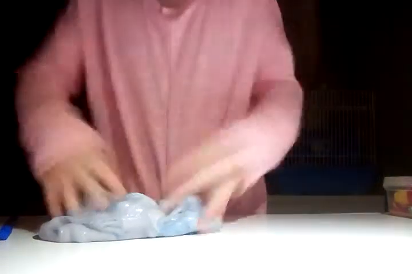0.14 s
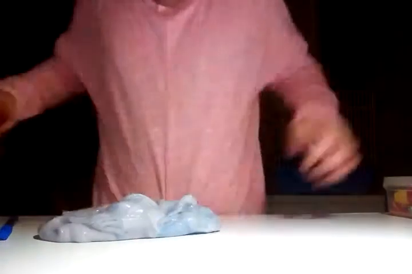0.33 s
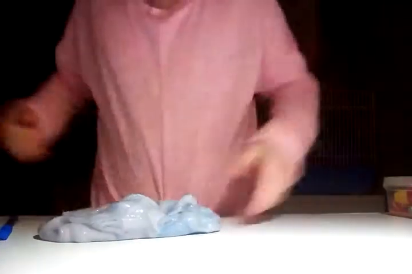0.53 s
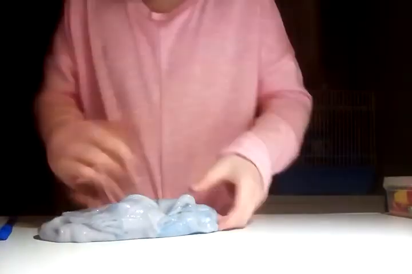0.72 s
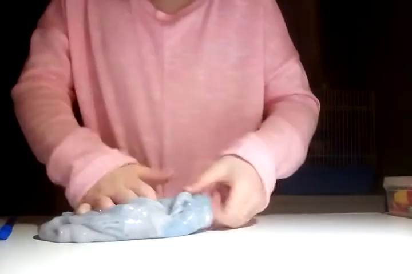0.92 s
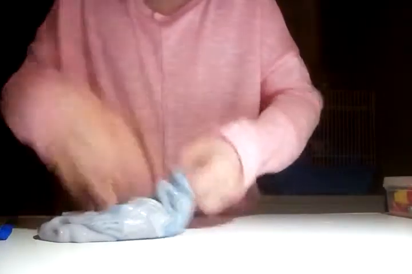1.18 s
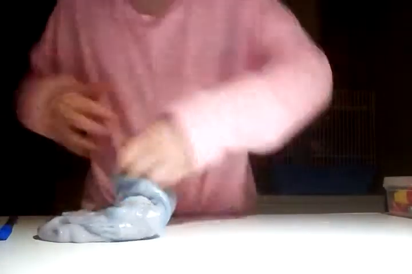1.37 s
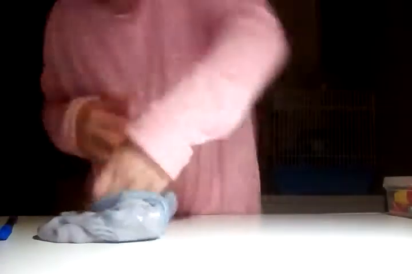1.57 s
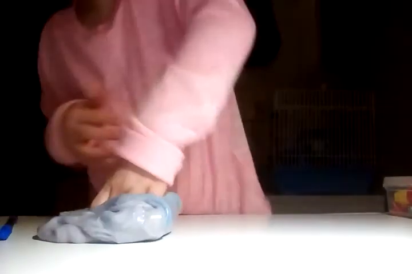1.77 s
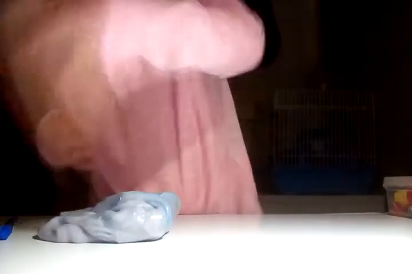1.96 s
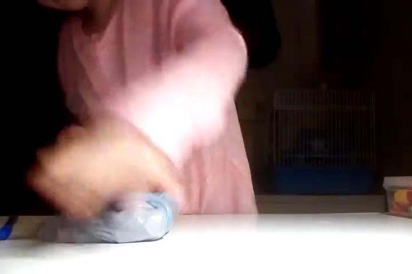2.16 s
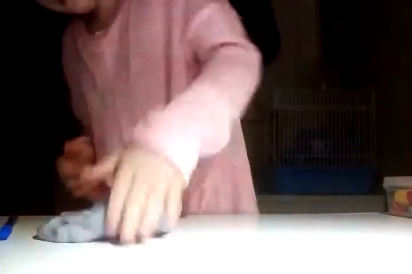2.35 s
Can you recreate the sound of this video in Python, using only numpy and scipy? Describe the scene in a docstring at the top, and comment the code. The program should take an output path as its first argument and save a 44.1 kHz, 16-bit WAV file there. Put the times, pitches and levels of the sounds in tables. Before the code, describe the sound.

Slime is squished by hand on a table, starting with the loudest wet squelch and a cluster of pops at about 0.2 seconds. Faint sticky crackles and small pops follow, with a dull palm thump near 0.9 and another squelch at 1.2. Light ticks come around 1.6 to 1.8, then a thumping, popping press at 2.0 and a softer one near 2.4, over a faint low room hum.

```python
"""Squeezing slime on a table

Hands slap, fold and squeeze a lump of slime in a small room. Trapped air pockets pop,
each squeeze drives out a spray of tiny bubbles, and the palm thumps the tabletop.
In between, the slime crackles faintly as it sticks to the fingers, and thin threads of it snap."""
import sys
import numpy as np
from scipy import signal
from scipy.fft import rfft, irfft, next_fast_len
from scipy.io import wavfile
from scipy.ndimage import map_coordinates

SR = 44100
rng = np.random.default_rng(int(sys.argv[2]) if len(sys.argv) > 2 else 0)


def pcm_store(signal):
    """Save signal as 16-bit PCM."""
    levels = np.round(np.clip(np.atleast_2d(signal), -1, 1) * 32767)
    wavfile.write(sys.argv[1], SR, levels.astype(np.int16).T)


N = 110250  # 2.5 seconds


def amp(db):
    """Turn decibels into a number to multiply by."""
    return 10 ** (np.asarray(db) / 20)


def unit(x):
    """Scale a sound to an average (rms) strength of 1."""
    return x / np.sqrt(np.mean(x ** 2) + 1e-20)


def along(points, hz):
    """Read between (frequency, value) points, with octaves evenly spaced."""
    f, values = np.transpose(points)
    return np.interp(np.log(hz + 1), np.log(f + 1), values)


def colour(x, tone):
    """Make some frequencies louder and others softer, following a tone table."""
    size = 2 * next_fast_len(len(x))
    gain = amp(along(tone, np.fft.rfftfreq(size, 1 / SR)))
    cepstrum = irfft(np.log(gain), size)
    # fold it so that the filter rings only after a sound, never before
    cepstrum[1:size // 2] *= 2
    cepstrum[size // 2 + 1:] = 0
    return irfft(rfft(x, size) * np.exp(rfft(cepstrum)), size)[:len(x)]


def add(track, start, sound):
    """Mix a sound in at a start time in seconds."""
    i = max(0, round(start * SR))
    part = sound[:max(0, N - i)]
    track[i:i + len(part)] += part


def dying(t, fade):
    """Die away by 60 dB every `fade` seconds."""
    return np.exp(-np.log(1000) * t / fade)


def crackle(per_s, scatter_db):
    """Clicks at random times and of random size."""
    happens = rng.random(N) < per_s / SR
    size = amp(scatter_db * rng.standard_normal(N))
    return happens * size * rng.choice([-1, 1], N)


def noise(samples, tone):
    """Steady noise with the given tone."""
    return unit(colour(rng.standard_normal(samples), tone))


# Tone of the room's background: f/Hz, level/dB
RUMBLE_TONE = [(25, 0), (60, -7), (100, 5), (150, -4.5), (250, -17), (600, -20.5), (1100, -27),
               (2000, -31.5), (6500, -30), (14000, -27.5)]

def rumble():
    """The room hums with a quiet, low noise throughout."""
    return amp(-52.5) * noise(N, RUMBLE_TONE)


# How the faint crackle and the soft rubbing rise and fall: t/s, level/dB
CLING_LEVELS = [(0.0, -53.5), (0.16, -66), (0.21, -57), (0.45, -73), (0.7, -68), (0.99, -65), (1.15, -58),
                (1.25, -50.5), (1.42, -62), (1.58, -71), (1.84, -59.5), (2.02, -67), (2.13, -71),
                (2.39, -77.5), (2.47, -64)]
RUB_LEVELS = [(0.0, -42.5), (0.18, -51.5), (0.25, -47), (0.36, -68), (0.41, -79), (0.67, -67), (1.13, -50),
              (1.23, -62), (1.37, -50.5), (1.43, -70), (1.66, -74), (1.79, -44.5), (1.84, -52), (1.9, -46),
              (2.08, -64), (2.31, -60.5), (2.4, -73), (2.47, -59)]
# Tone of wet clicks (also used for the spray) and of rubbing: f/Hz, level/dB
WET_TONE = [(300, -11), (1200, -2), (2100, -1.5), (3000, 5.5), (3700, -3.5), (4400, 4.5), (5400, -0.5),
            (6500, 0.5), (8000, -9), (13000, -9.5)]
RUB_TONE = [(100, -18.5), (250, -6), (350, -4.5), (600, 0.5), (800, 0), (1100, -5.5), (1500, -9.5),
            (3000, -23.5), (8000, -47.5)]

def sticky_fingers():
    """Slime clings to moving fingers: a fine crackle over soft rubbing."""
    t = np.arange(N) / SR
    ticks = unit(colour(crackle(per_s=2200, scatter_db=6), WET_TONE))
    rub = unit(colour(crackle(per_s=2200, scatter_db=6), RUB_TONE))
    ticks_db = np.interp(t, *np.transpose(CLING_LEVELS)) - 1
    rub_db = np.interp(t, *np.transpose(RUB_LEVELS)) - 2
    return amp(ticks_db) * ticks + amp(rub_db) * rub


# Air pockets that burst: t/s, ring level/dB, f/Hz, fade/s, snap level/dB
AIR_POCKETS = [(0.178, -34.5, 1050, 0.035, -70.5), (0.1999, -9.5, 1026, 0.011, -16.5),
               (0.2046, -1.5, 436, 0.02, -32.5), (.2135, -3, 680, .025, -24.5),
               (0.2214, -5, 505, 0.05, -46), (0.2464, 0.5, 924, 0.018, -8.5),
               (.3545, -17, 972, 0.0076, -30.5), (.363, -31, 514, 0.042, -66.5),
               (0.6496, -28, 1088, 0.012, -62), (0.6523, -34, 1984, 0.0062, -45),
               (0.806, -32.5, 979, .016, -43), (0.811, -32, 450, 0.0083, -62),
               (0.904, -37, 1074, 0.028, -44.5), (0.978, -40, 1470, 0.032, -66.5),
               (1.0022, -23, 2940, 0.0058, -29), (1.003, -31.5, 1120, 0.03, -48),
               (1.005, -21.5, 2720, 0.0079, -49), (1.062, -35, 1100, 0.0043, -32),
               (1.0987, -32.5, 2580, 0.026, -34), (1.1173, -33.5, 454, 0.038, -64),
               (1.191, -25.5, 1050, .035, -47), (1.2185, -19, 508, 0.014, -32.5),
               (1.2251, -14.5, 458, 0.01, -49), (1.235, -23.5, 1000, .02, -46),
               (1.608, -37, 1137, 0.028, -28.5), (1.62, -39, 1016, .012, -29),
               (1.626, -33.5, 420, 0.06, -47), (1.656, -25, 1105, 0.0065, -41),
               (1.671, -30, 420, 0.02, -59), (1.7282, -29.5, 930, 0.015, -63), (1.732, -26, 508, .028, -68),
               (1.7846, -42, 1206, 0.028, -33), (1.787, -53.5, 2500, 0.025, -33.5),
               (1.908, -36, 571, 0.045, -35), (1.953, -25.5, 1085, .018, -53),
               (1.967, -20.5, 1073, .012, -24.5), (1.977, -17.5, 503, .025, -32),
               (1.987, -21.5, 1004, .025, -55), (1.999, -17, 484, 0.076, -45),
               (2.009, -18, 348.5, .04, -52), (2.354, -36, 1063, 0.06, -49),
               (2.362, -39.5, 1624, 0.026, -52), (2.437, -34, 504, 0.054, -37),
               (2.481, -34.5, 1097, 0.047, -32), (2.496, -30.5, 4020, 0.045, -40)]
# Tone of a pocket's snapping skin: f/Hz, level/dB
SNAP_TONE = [(200, -17), (900, 9), (1600, 10.5), (2200, -5), (3000, 1.5), (3700, -16.5), (4400, 4),
             (5400, -9.5), (6500, 0.5), (12000, -31)]

def pops():
    """A pocket's skin snaps and its air rings briefly, shaky and sagging in pitch."""
    attack_s, sag_s, shakes_per_cycle = 0.0006, 0.0036, 2.466
    out, t = np.zeros(N), np.arange(SR // 10) / SR
    for start, db, hz, fade, snap_db in AIR_POCKETS:
        # the soft wall shakes the pitch, which starts high and sags as the pocket opens
        shake = map_coordinates(rng.standard_normal(len(t)), [t * hz * shakes_per_cycle])
        pitch = hz * (1 + 0.08 * np.exp(-t / sag_s) + 0.19 * shake)
        phase = 2 * np.pi * np.cumsum(pitch) / SR
        shape = (1 - np.exp(-t / attack_s)) * dying(t, fade)
        ring = np.sin(phase) * shape / shape.max()
        snap = noise(len(t), SNAP_TONE) * dying(t, fade=0.017)
        add(out, start, amp(db) * ring + amp(snap_db) * snap)
    return out


def bubbles(sizes=24, per_s=1500, middle_hz=680, ring_cycles=7):
    """A dense froth of tiny bubbles; smaller ones ring higher and die sooner."""
    froth, t = np.zeros(N), np.arange(SR // 20) / SR
    for step in np.linspace(-2, 2, sizes):
        hz = middle_hz * np.exp(0.62 * step)
        ring = np.sin(2 * np.pi * hz * t) * dying(t, ring_cycles / hz)
        starts = crackle(per_s / sizes, scatter_db=3)
        weight = np.exp(-step ** 2 / 4)  # middle sizes are strongest
        froth += weight * signal.fftconvolve(starts, ring)[:N]
    return unit(froth)


# Presses, each at its hardest: t/s, rise/s, fall/s, bubble level/dB, spray level/dB, fizz level/dB
PRESSES = [(.204, 0.011, 0.084, -16.5, -30.5, -34), (.252, 0.04, 0.051, -27.5, -34.5, -51),
           (0.276, 0.0067, 0.012, -33, -27, -58), (.288, .02, 0.0071, -52, -29, -27),
           (0.661, 0.029, 0.071, -45, -67, -70.5), (0.916, 0.025, 0.016, -51, -50.5, -63),
           (1.008, 0.03, 0.055, -47, -56, -61.5), (1.098, 0.0034, 0.019, -68, -62, -37.5),
           (1.164, 0.086, 0.0126, -47, -51.5, -63.5), (1.214, 0.022, 0.027, -23, -31, -36),
           (1.24, .03, 0.072, -33.5, -49.5, -70), (1.46, 0.045, 0.046, -63, -54, -62),
           (1.621, 0.012, 0.011, -37.5, -35, -34), (1.669, 0.026, 0.022, -40.5, -47, -56),
           (1.787, 0.0054, 0.038, -57, -48.5, -40.5), (1.982, 0.033, 0.026, -22.5, -32, -57.5),
           (2.004, .02, 0.026, -29, -45, -63), (2.364, 0.013, 0.011, -35, -48.5, -73),
           (2.45, 0.1, 0.044, -37, -51.5, -64), (2.498, 0.037, .05, -66, -41.5, -37)]
# Tone of tearing slime film: f/Hz, level/dB
FIZZ_TONE = [(2000, -40.5), (4500, -21.5), (6500, -5), (8500, -10), (12000, 0.5), (15000, 0.5)]

def squeezes():
    """Each press swells and fades, driving bubbles, a wet spray and the fizz of tearing film."""
    t = np.arange(N) / SR
    bubble_gain, spray_gain, fizz_gain = np.zeros((3, N))
    for peak, rise, fall, bubble_db, spray_db, fizz_db in PRESSES:
        press = 10 ** -np.maximum((peak - t) / rise, (t - peak) / fall)  # 20 dB per rise or fall time
        bubble_gain += amp(bubble_db) * press
        spray_gain += amp(spray_db) * press
        fizz_gain += amp(fizz_db) * press
    spray = unit(colour(crackle(per_s=2500, scatter_db=6), WET_TONE))
    fizz = unit(colour(crackle(per_s=2500, scatter_db=6), FIZZ_TONE))
    return bubble_gain * bubbles() + spray_gain * spray + fizz_gain * fizz


# The palm landing on the table: t/s, level/dB, contact/s
PALM_HITS = [(0.204, -21, 0.001), (0.249, -30, 0.0015), (0.291, -26.5, 0.0034), (.325, -29.5, 0.006),
             (.36, -29, 0.0084), (.654, -32.5, 0.0051), (0.867, -41, 0.0046), (0.913, -19.5, 0.015),
             (0.935, -27, 0.0082), (1.222, -27.5, 0.0012), (1.254, -26.5, 0.0044), (1.909, -40.5, 0.0026),
             (1.956, -26.5, 0.0012), (1.972, -17.5, 0.0041), (2.003, -14, 0.0052), (2.032, -28, 0.0094),
             (2.359, -24.5, 0.004), (2.395, -33, 0.0035)]
# Notes the tabletop rings with: f/Hz, level/dB, fade/s
TABLE_NOTES = [(87, -10.5, 0.048), (108.5, 0, 0.19), (136.1, -6, .13), (178.5, -6.5, 0.13),
               (286.6, -16, 0.068), (332.5, 0, 0.11), (359.5, -8.5, .14), (519, -6, 0.12), (633, -9, 0.15),
               (1043, -7.5, 0.12)]
# How well the tabletop passes its shaking to the air: f/Hz, level/dB
TABLE_TONE = [(30, -25.5), (55, -23), (85, -0.5), (150, 7.5), (300, 0.5), (700, 10.5)]

def thumps():
    """A soft push of the palm rings the tabletop; a longer contact sounds duller."""
    out, t = np.zeros(N), np.arange(SR // 2) / SR
    for start, db, contact in PALM_HITS:
        ring = np.zeros(len(t))
        for hz, note_db, fade in TABLE_NOTES:
            strength = amp(note_db + rng.normal(0, 0.52))  # no two hits are quite alike
            ring += strength * np.sin(2 * np.pi * hz * t) * dying(t, fade)
        push = t * dying(t, contact)
        thump = signal.fftconvolve(ring, push / push.sum())[:len(t)]
        add(out, start, amp(db) * thump)
    return colour(out, TABLE_TONE)


# Single threads of slime that break: t/s, level/dB
THREAD_BREAKS = [(0.399, -60), (.457, -42), (0.736, -64), (0.7784, -49), (.8765, -48), (1.0025, -34),
                 (1.0988, -41), (1.36, -52), (1.62, -34.5), (1.785, -30)]
# Tone of a breaking thread: f/Hz, level/dB
THREAD_TONE = [(1500, -23), (3700, -13), (4800, -1), (5600, 17), (6500, -9), (9000, -7), (12000, 9)]

def threads():
    """A stretched thread parts with one thin, crisp tick."""
    out, t = np.zeros(N), np.arange(SR // 20) / SR
    for start, db in THREAD_BREAKS:
        tick = noise(len(t), THREAD_TONE) * dying(t, fade=0.009)
        add(out, start, amp(db) * tick)
    return out


# First echoes from nearby surfaces: delay/s, gain
EARLY_ECHOES = [(.0023, 0.38), (.0037, 0.31), (.0052, 0.15), (0.011, .14), (0.0182, 0.058)]
# How long the room keeps ringing: f/Hz, fade/s
ROOM_FADES = [(100, .3), (500, .24), (1200, .24), (3000, .25), (7000, .22), (12000, .12)]

def room(x):
    """Nearby surfaces echo first, then comes a short, blurred tail."""
    out = x.copy()
    for delay, gain in EARLY_ECHOES:
        add(out, delay, gain * x)
    hz, t, bands = signal.stft(rng.standard_normal(SR // 2), SR, nperseg=256)
    fades = along(ROOM_FADES, hz)[:, None]
    _, tail = signal.istft(bands * dying(t, fades), SR, nperseg=256)
    echoes = signal.fftconvolve(x, tail / np.linalg.norm(tail))
    add(out, start=0.004, sound=amp(-14.5) * echoes)
    return out


# How the hands and tabletop around the slime change its tone: f/Hz, level/dB
SURROUNDING_TONE = [(150, 0), (230, -0.5), (350, 3), (440, -3), (520, -0.5), (720, -2), (900, -3.5),
                    (1090, 6), (1300, -5.5), (1500, -0.5), (2000, 0)]

def scene():
    """The slime with its room echoes, plus the table thumps and the quiet rumble."""
    background = rumble()
    slime = colour(sticky_fingers() + pops() + squeezes() + threads(), SURROUNDING_TONE)
    return (background + room(slime) + thumps())[None]


# How strongly the microphone picks up each frequency: f/Hz, level/dB
MIC_TONE = [(20, -11.5), (70, -0.5), (6700, -4.5), (7700, -21), (12000, -20.5), (15000, -32.5)]

def record(dry):
    """A small microphone, dull above 7 kHz, that cuts off the very highest sounds."""
    top_hz = 15600
    size = next_fast_len(N + SR // 2)
    spectrum = rfft(colour(dry[0], MIC_TONE), size)
    passes = np.fft.rfftfreq(size, 1 / SR) < top_hz
    return irfft(spectrum * passes, size)[None, :N]


dry = scene()
out = record(dry)
pcm_store(out)
```